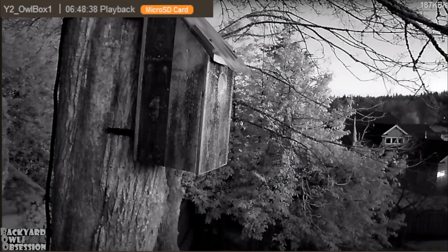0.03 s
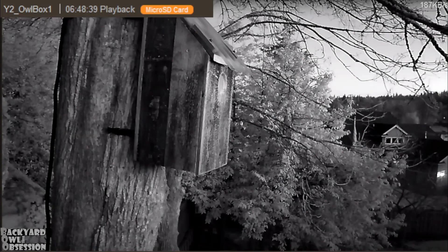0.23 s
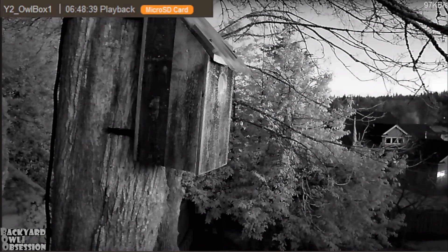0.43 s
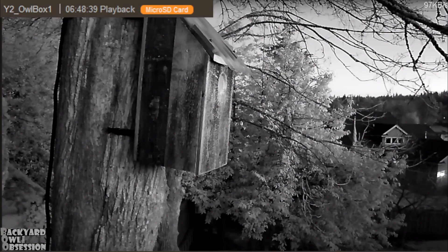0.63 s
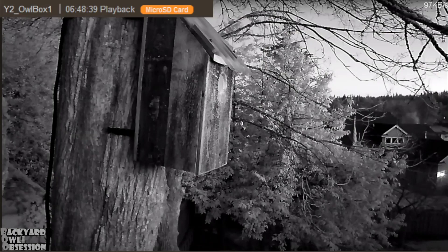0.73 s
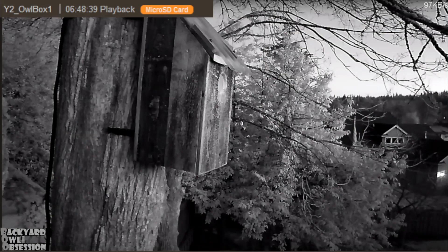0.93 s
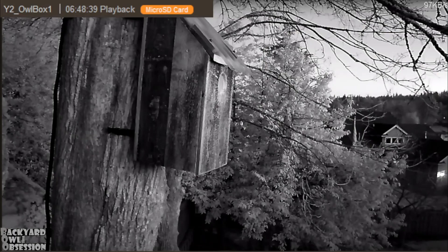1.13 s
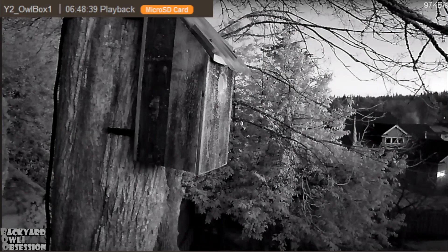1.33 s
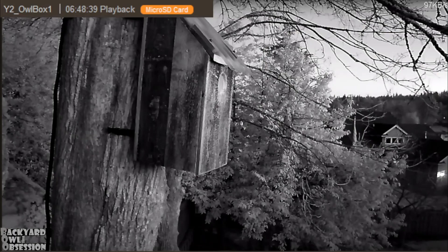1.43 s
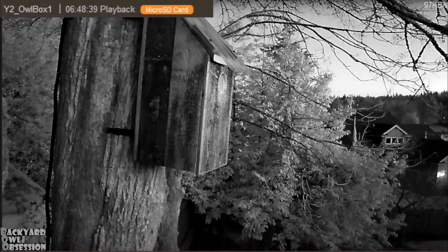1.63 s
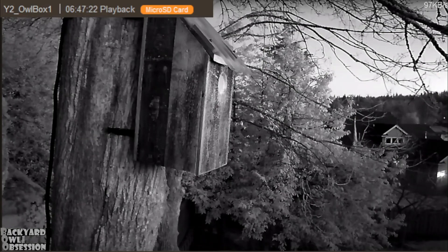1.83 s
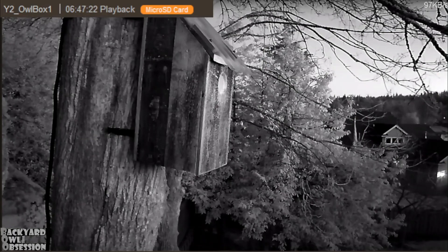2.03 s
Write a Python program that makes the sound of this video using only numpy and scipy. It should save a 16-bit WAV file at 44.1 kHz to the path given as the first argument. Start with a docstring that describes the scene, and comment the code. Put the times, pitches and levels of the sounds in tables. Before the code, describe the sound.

A bird gives one sharp, high chirp that echoes among backyard trees. Small dry claw ticks, a short scrape and soft brushing come from a wooden nest box close by. Fainter whistles follow farther off, over low rumble and thin hiss.

```python
"""A bird gives one sharp chirp, an upward flick over a warbling note, that echoes among backyard trees.
Fainter whistles follow from farther off. Close by, on a wooden nest box, come small dry ticks and one
short stick-slip scrape, probably claws, with soft feathery brushing and a faint crackle.
A low distant rumble and a thin hiss lie underneath, and a small camera's microphone cuts the top end."""
import sys
import numpy as np
from scipy import signal
from scipy.fft import rfft, irfft
from scipy.io import wavfile

SR = 44100
rng = np.random.default_rng(int(sys.argv[2]) if len(sys.argv) > 2 else 0)


def transcribe(signal):
    """Save signal, clipped to [-1, 1], as a 16-bit WAV file at the path in sys.argv[1]."""
    frames = np.atleast_2d(signal).T
    limited = np.clip(frames, -1, 1)
    pcm = np.round(limited * 32767).astype(np.int16)
    wavfile.write(sys.argv[1], SR, pcm)


N = 92610  # 2.1 s

# Bright snap of a claw on wood: freq_hz, relative_db
SNAP_SPECTRUM = [(2000, -35.5), (3500, -22), (5000, -17.5), (6000, -6.5), (6600, 8.5), (7000, 9.5),
                 (7500, -15.5), (8100, -13)]
# Woody knock under the snap: freq_hz, relative_db
KNOCK_SPECTRUM = [(1500, -37.5), (2100, -16), (2400, -4), (2750, 3.5), (3300, -15), (4300, -6.5),
                  (5500, -14.5), (8000, -31.5)]


def amp(db):
    """Decibels to gain."""
    return 10 ** (np.asarray(db) / 20)


def unit(x):
    """Scales to rms 1."""
    return x / np.sqrt(np.mean(x ** 2) + 1e-20)


def add(mix, start_s, sound):
    """Lays a sound into the mix at start_s."""
    part = mix[max(round(start_s * SR), 0):][:len(sound)]
    part += sound[:len(part)]


def colour(x, spectrum):
    """EQ through (freq_hz, relative_db) points; rms 1."""
    hz, db = np.transpose(spectrum)
    freqs = np.fft.rfftfreq(len(x), 1 / SR)
    gain = amp(np.interp(np.log(freqs + 1), np.log(hz), db))
    return unit(irfft(rfft(x) * gain, len(x)))


def wander(rate_hz):
    """Random drift that rolls off above rate_hz; rms 1."""
    freqs = np.fft.rfftfreq(N, 1 / SR)
    lowpass = np.exp(-(freqs / rate_hz) ** 2) * (freqs > 0)
    return unit(irfft(rfft(rng.standard_normal(N)) * lowpass, N))


def background():
    """The bed: a distant rumble swells and sinks under a thin, slightly flickering hiss."""
    # Colours of the rumble and the air: freq_hz, relative_db
    rumble_spectrum = [(30, -46), (55, -54), (78, -40.5), (100, -15.5), (130, -7.5), (165, 1), (200, 1.5),
                       (270, -3.5), (340, -15), (450, -30.5), (700, -36.5), (1500, -58.5)]
    hiss_spectrum = [(100, -16), (400, 12), (600, 4), (850, -0.5), (1200, 4), (1550, 9.5), (1750, 4),
                     (1950, -8.5), (2150, -9), (2700, 0), (3300, -1), (4000, 2), (4800, -9), (5500, -5),
                     (6800, -3.5), (7500, -11), (8100, -6.5)]
    # Swells of the rumble: time_s, level_db
    swells = [(0, -50.5), (.17, -56), (.4, -54), (0.621, -55), (.71, -51), (.86, -53), (1.0, -57),
              (1.11, -49), (1.23, -56), (1.42, -51), (1.57, -59.5), (1.65, -54.5), (1.76, -55),
              (1.881, -57.5), (2.1, -58)]
    level = amp(np.interp(np.arange(N) / SR, *np.transpose(swells)))
    rumble = level * colour(rng.standard_normal(N), rumble_spectrum)
    hiss = amp(-65.5 + wander(rate_hz=36)) * colour(rng.standard_normal(N), hiss_spectrum)
    return rumble + hiss


def crackle():
    """Faint rustle: tiny random clicks, coloured like the claw ticks."""
    clicks_per_s, spread_db = 320, 5
    hits = rng.random(N) < clicks_per_s / SR
    clicks = hits * amp(spread_db * np.minimum(rng.exponential(1, N), 3))
    return amp(-82) * (colour(clicks, SNAP_SPECTRUM) + 0.37 * colour(clicks, KNOCK_SPECTRUM))


def brushing():
    """Grainy swells of friction, like feathers rubbing on wood."""
    # Soft strokes: middle_s, length_s, level_db
    strokes = [(.105, 0.046, -65.5), (0.505, 0.043, -62), (0.595, 0.055, -65.5), (0.697, 0.058, -69),
               (.855, .12, -67), (0.991, 0.02, -63), (1.472, 0.054, -67.5), (1.509, 0.024, -60.5),
               (1.658, 0.082, -68.5), (1.732, 0.066, -66.5), (1.935, 0.013, -70.5), (2.028, 0.034, -67)]
    # Colour of the friction: freq_hz, relative_db
    spectrum = [(1800, -13.5), (2600, -1.5), (3300, -15.5), (4200, -6), (5400, -6.5), (6100, -1), (6800, 4),
                (7500, 1), (8100, -5.5)]
    t, grain_db = np.arange(N) / SR, 4.5
    level = sum(amp(db) * np.exp(-2 * ((t - middle) / length) ** 2) for middle, length, db in strokes)
    friction = rng.standard_normal(N) * amp(grain_db * wander(rate_hz=380))
    return level * colour(friction, spectrum)


def claw_ticks():
    """Each tap on the wood is a gritty burst of a few milliseconds, a bright snap plus a woody knock."""
    # Claw taps, levels before the trims: start_s, unused peak_db, snap_db, knock_db
    taps = [(0.025, -51, -55.5, -62), (0.0453, -52, -55, -83), (0.0715, -49, -69, -63),
            (0.081, -32, -51.5, -59), (0.1128, -44, -57, -63), (0.1232, -53, -59, -74),
            (0.1772, -48, -66, -59.5), (0.3024, -32, -71, -58), (0.3223, -31, -78, -63.5),
            (0.367, -42, -74, -64), (0.3765, -43, -79, -61), (0.467, -48, -56.5, -63),
            (0.4771, -41, -45.5, -79), (0.4857, -37, -39.5, -62), (0.4882, -39, -42, -58.5),
            (0.5036, -46, -49.5, -84), (0.5118, -47, -59, -68), (0.5738, -46, -53.5, -67),
            (0.5822, -44, -51.5, -69), (0.5993, -52, -61, -63), (0.618, -50, -66, -62.5),
            (0.6862, -52, -64, -60), (0.6962, -46, -52.5, -62), (0.735, -54, -62.5, -64),
            (0.7434, -57, -59, -70), (0.8393, -43, -50.5, -60), (0.848, -53, -71, -62),
            (0.8752, -42.5, -53, -62), (0.89, -38, -43, -76), (0.8934, -42, -51, -62.5),
            (0.994, -44, -50.5, -67), (0.9964, -45, -53.5, -63), (1.125, -38, -60, -60),
            (1.2324, -52, -58.5, -60.5), (1.3128, -50, -59.5, -66), (1.3478, -52, -58, -75),
            (1.3962, -58, -65, -77), (1.4285, -54, -65, -81), (1.4975, -50, -58, -62.5),
            (1.5045, -46, -55, -55.5), (1.6132, -51, -63, -60), (1.66, -50, -55.5, -67),
            (1.693, -49, -55.5, -72), (1.7042, -53, -59, -80), (1.728, -49, -64, -56.5),
            (1.8655, -57, -80, -64), (1.9322, -49, -65, -59), (2.019, -50, -57.5, -61),
            (2.029, -56, -65, -67), (2.0825, -48, -49.5, -69)]
    rise_s, decay_s = .0014, .0037
    snap_trim_db, knock_trim_db = -11.5, -9.5
    out, t = np.zeros(N), np.arange(1024) / SR
    envelope = np.minimum(t / rise_s, 1) * np.exp(-np.maximum(t - rise_s, 0) / decay_s)
    for start, _, snap_db, knock_db in taps:
        noise, grain = rng.standard_normal((2, len(t)))
        burst = envelope * noise * np.exp(.35 * grain)
        snap = amp(snap_db + snap_trim_db) * colour(burst, SNAP_SPECTRUM)
        knock = amp(knock_db + knock_trim_db) * colour(burst, KNOCK_SPECTRUM)
        add(out, start, snap + knock)
    return out


def claw_scrape():
    """A claw sticks and slips in a quick, nearly even run, and each slip rings briefly."""
    # Resonances struck by a slip: freq_hz, level_db, t60_s
    modes = [(2680, -63.5, 0.041), (5500, -48, .006), (6070, -43, 0.0062), (6320, -45, 0.011),
             (7270, -53, 0.0081), (7860, -63, 0.0082)]
    start_s, length_s, slips_per_s = .517, .058, 280
    rise_s, jitter, spread_db = .0012, .05, 2
    out, t = np.zeros(N), np.arange(1024) / SR
    ring = sum(amp(db - 60 * t / t60) * np.sin(2 * np.pi * hz * t) for hz, db, t60 in modes)
    ring *= np.minimum(t / rise_s, 1)
    slip_times = start_s + np.arange(0, length_s, 1 / slips_per_s)
    for slip_s, (late, force) in zip(slip_times, rng.standard_normal((64, 2))):
        add(out, slip_s + late * jitter / slips_per_s, amp(spread_db * force) * ring)
    return out


def far_whistles():
    """Farther birds whistle short, wavering glides that swell and fade."""
    # Distant calls: start_s, length_s, from_hz, to_hz, waver_hz, level_db
    calls = [(0.817, 0.09, 6350, 5930, 383, -69), (0.932, 0.064, 5450, 5350, 135.6, -75),
             (0.986, 0.057, 5250, 5270, 61.5, -61.5), (0.991, 0.051, 4110, 4170, 60, -69.5),
             (1.025, 0.063, 4100, 4210, 85, -60), (1.056, 0.081, 4285, 4313, 101.5, -60.5),
             (1.118, 0.015, 4300, 4353, 67.5, -55), (1.138, .12, 4260, 4250, 140, -73),
             (1.275, .07, 5720, 5540, 423, -67.5), (1.398, .04, 4210, 3970, 160, -70.5),
             (1.575, .035, 4170, 4150, 194, -71), (1.745, 0.043, 4120, 3990, 144, -73)]
    out = np.zeros(N)
    for start, length, from_hz, to_hz, waver_hz, db in calls:
        n = int(length * SR)
        progress = np.linspace(0, 1, n)
        pitch = from_hz + (to_hz - from_hz) * progress + waver_hz * wander(rate_hz=420)[:n]
        swell = np.sqrt(progress * (1 - progress))
        flutter = 1 + .4 * wander(rate_hz=210)[:n]
        add(out, start, amp(db) * unit(swell * flutter * np.sin(2 * np.pi * np.cumsum(pitch) / SR)))
    return out


def bird_voice(contour):
    """A warbling, fluttering tone that follows a contour of pitch and level."""
    t, warble_depth_hz = np.arange(N) / SR, 80
    times, hz, db = np.transpose(contour)
    pitch = np.interp(t, times, hz) + warble_depth_hz * wander(rate_hz=210)
    level = amp(np.interp(t, times, db, left=-np.inf, right=-np.inf))
    flutter = 1 + .55 * wander(rate_hz=210)
    tone = level * flutter * np.sin(2 * np.pi * np.cumsum(pitch) / SR)
    return np.sqrt(np.mean(level ** 2)) * unit(tone)


def chirp():
    """The near bird: an upward flick overlaps a held note, with a breathy edge."""
    # Opening flick and held note: time_s, pitch_hz, level_db
    flick = [(.194, 4050, -60), (.204, 4550, -51.5), (.211, 5050, -53.5), (.2155, 6100, -41),
             (.221, 6850, -49), (.225, 7000, -56.5), (.23, 6750, -44), (.246, 6200, -52.5)]
    held_note = [(.209, 4250, -60.5), (.217, 4280, -49), (.232, 4330, -39.5), (.242, 4370, -36),
                 (.255, 4320, -34), (.273, 4260, -33.5), (.297, 4350, -42), (.311, 4380, -35.5),
                 (.318, 4420, -58.5)]
    # Colour of the breath: freq_hz, relative_db
    breath_spectrum = [(3200, -17.5), (3600, 4.5), (4500, 15), (5300, 4.5), (6000, 2), (6700, 3),
                       (7300, -2.5), (8000, -6.5)]
    breath_on_s, breath_off_s, rise_s, decay_s = .2056, .3, .01, .028
    t = np.arange(N) / SR
    tones = bird_voice(flick) + bird_voice(held_note)
    attack = np.clip((t - breath_on_s) / rise_s, 0, 1)
    release = np.exp(-np.maximum(t - breath_off_s, 0) / decay_s)
    return tones + amp(-46) * attack * release * colour(rng.standard_normal(N), breath_spectrum)


def scatter(x, t60_s):
    """Reverb from many weak reflections off trunks and branches, as strong as the direct sound."""
    t, reflections_per_s = np.arange(SR) / SR, 2000
    reflections = rng.standard_normal(SR) * (rng.random(SR) < reflections_per_s / SR)
    tail = reflections * amp(-60 * t / t60_s)
    return x.std() * unit(signal.fftconvolve(x, tail)[:N])


def birds():
    """Far whistles and the near chirp share the yard's reverb; the chirp also throws distinct echoes."""
    # Slapback from trees and houses: delay_s, gain_db
    echoes = [(0.06, -16.5), (0.102, -24), (.129, -19)]
    yard_t60_s = .57
    call, far = chirp(), far_whistles()
    branch_blur = amp(-8) * scatter(call, t60_s=.08)
    near = amp(-1) * call.std() * unit(call + branch_blur)
    reverb = amp(-13) * scatter(near, yard_t60_s) + amp(-12) * scatter(far, yard_t60_s)
    out = near + far + reverb
    for delay, db in echoes:
        add(out, delay, amp(db) * near)
    return out


def scene():
    """The bed, the birds and the nest box sounds, mixed in mono."""
    return (background() + birds() + claw_ticks() + claw_scrape() + brushing() + crackle())[None]


def record(dry):
    """The small camera's band limit: a steep high cut."""
    cutoff_hz = 8010
    lowpass = signal.firwin(801, cutoff_hz, window=("kaiser", 8), fs=SR)
    return signal.oaconvolve(dry, lowpass[None], "same")


dry = scene()
out = record(dry)
transcribe(out)
```